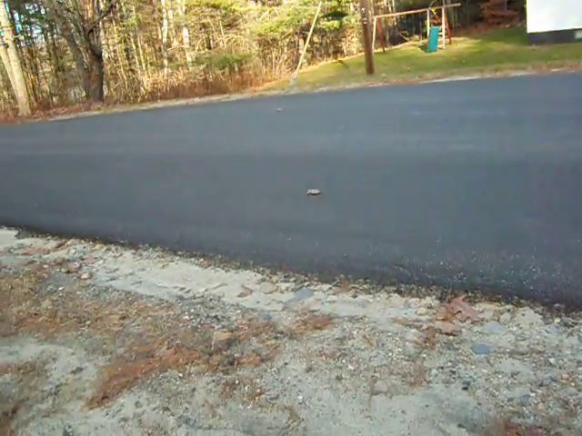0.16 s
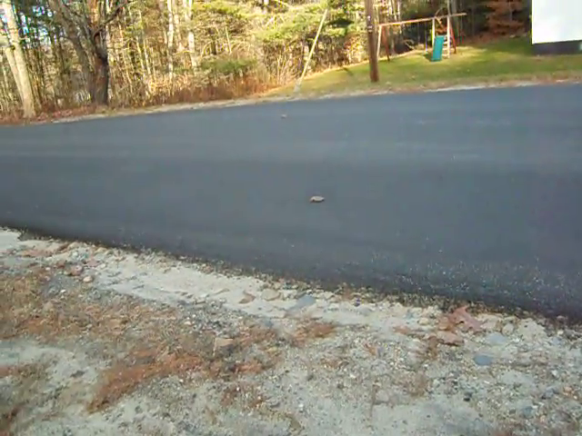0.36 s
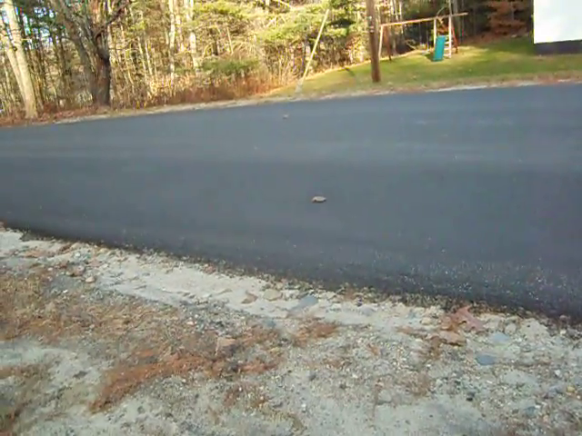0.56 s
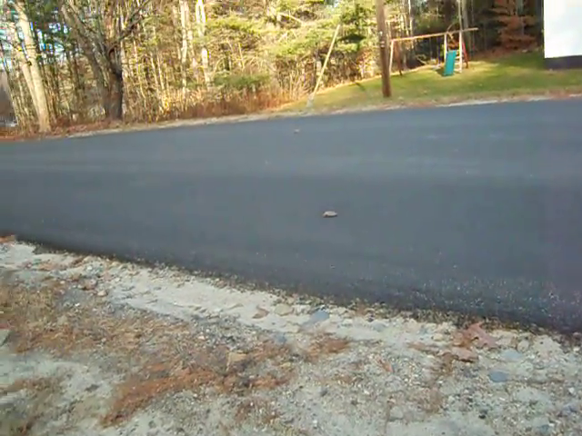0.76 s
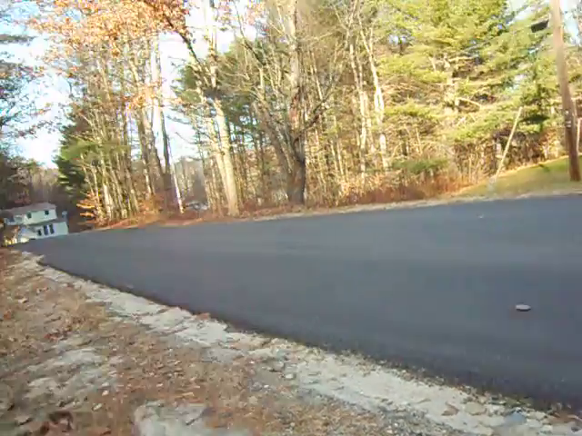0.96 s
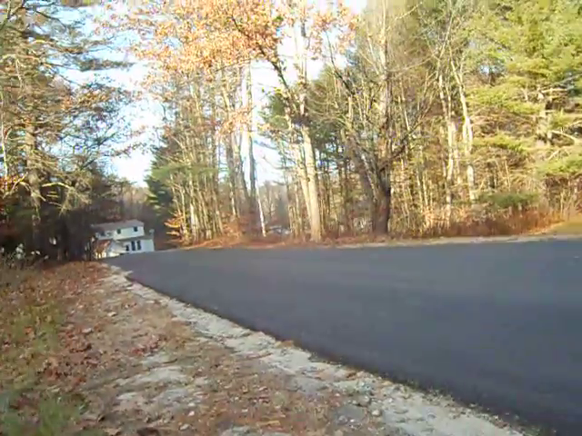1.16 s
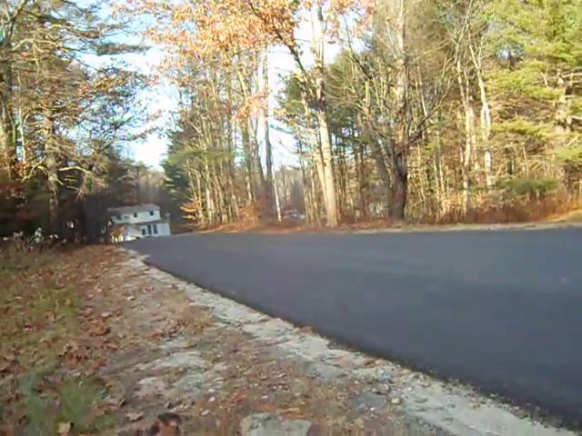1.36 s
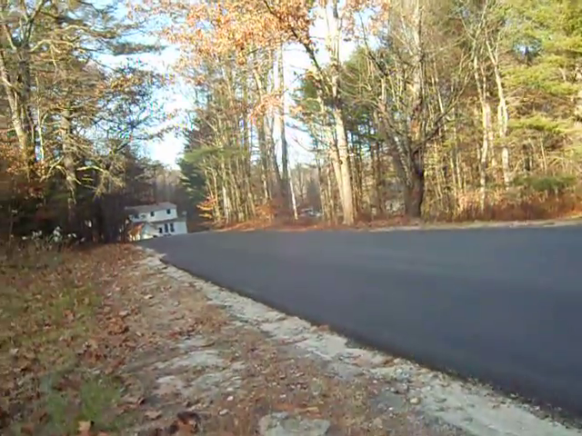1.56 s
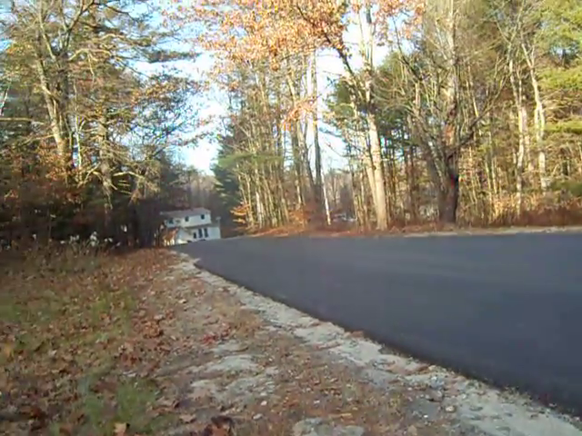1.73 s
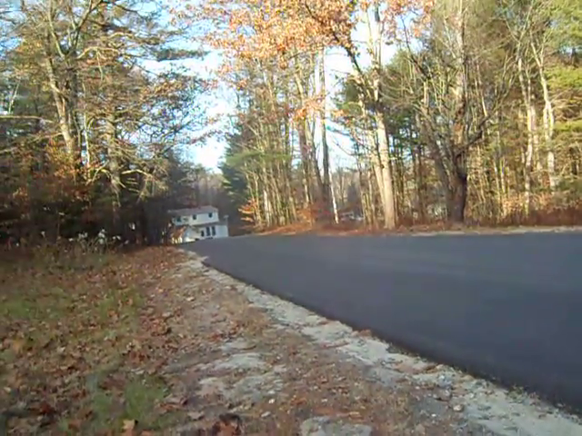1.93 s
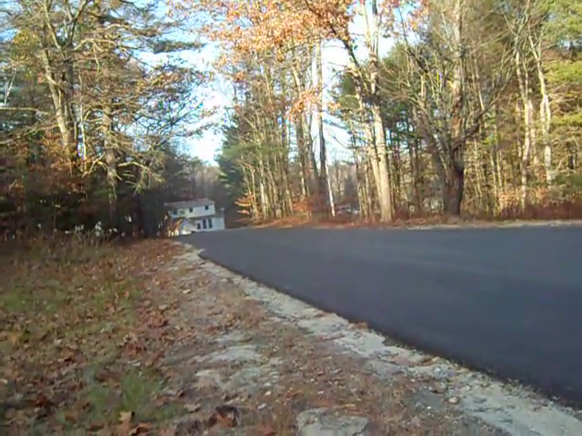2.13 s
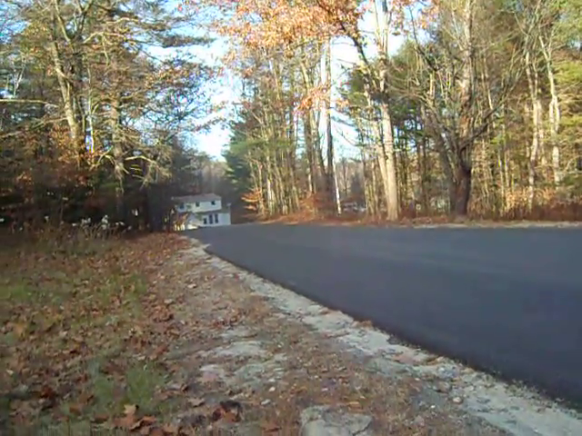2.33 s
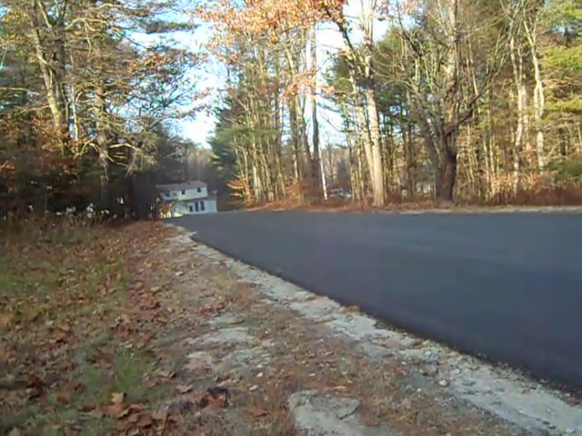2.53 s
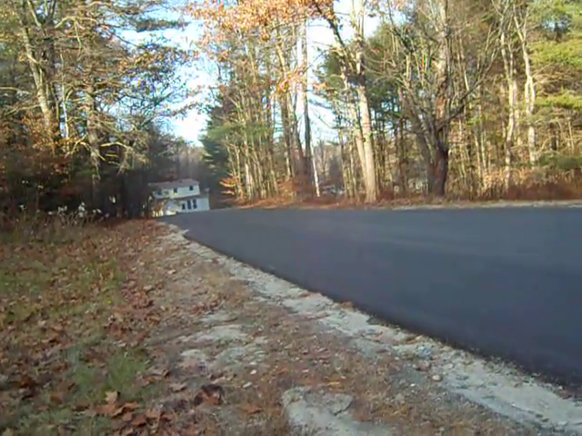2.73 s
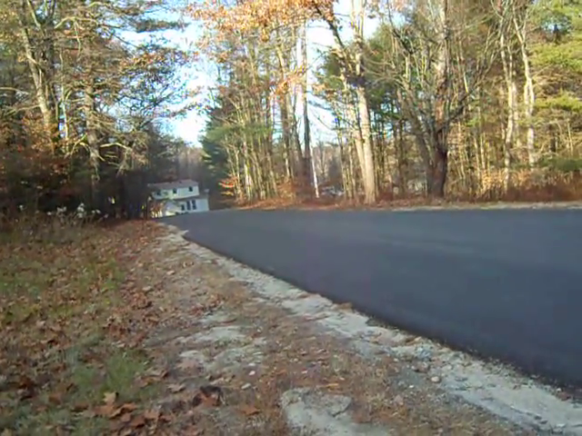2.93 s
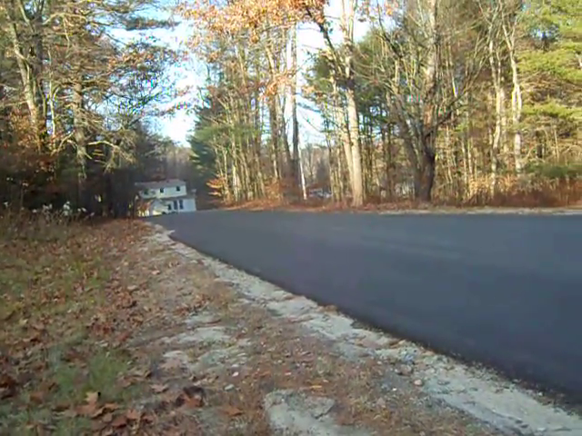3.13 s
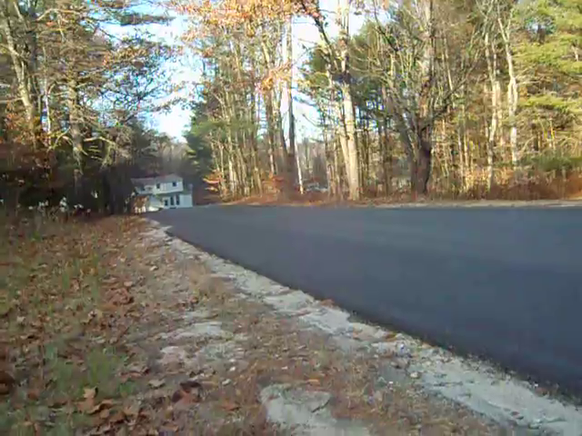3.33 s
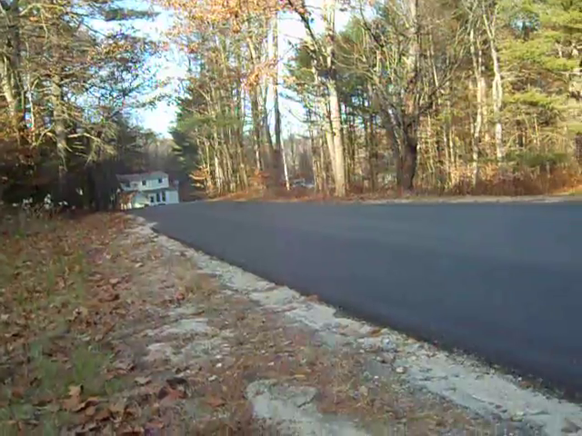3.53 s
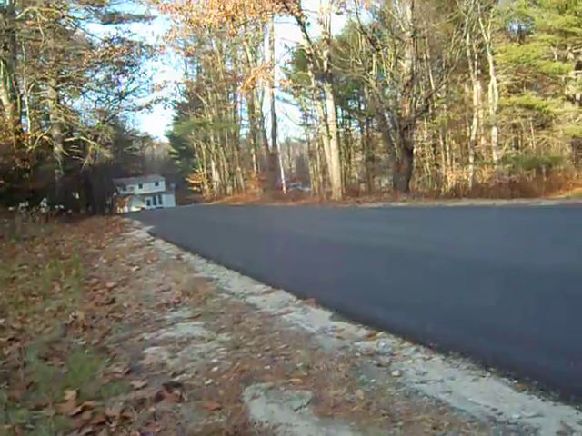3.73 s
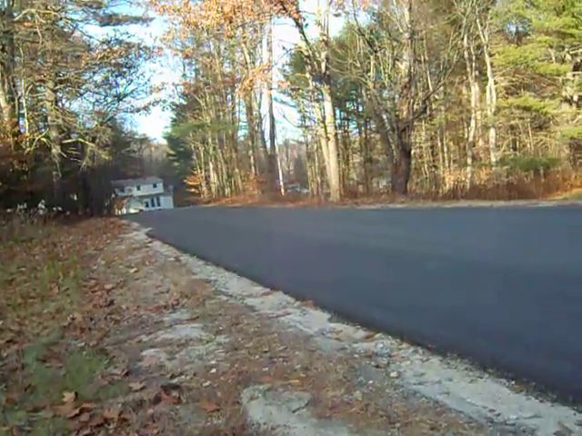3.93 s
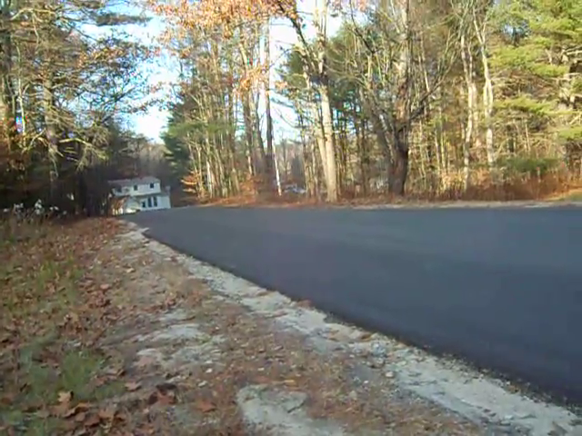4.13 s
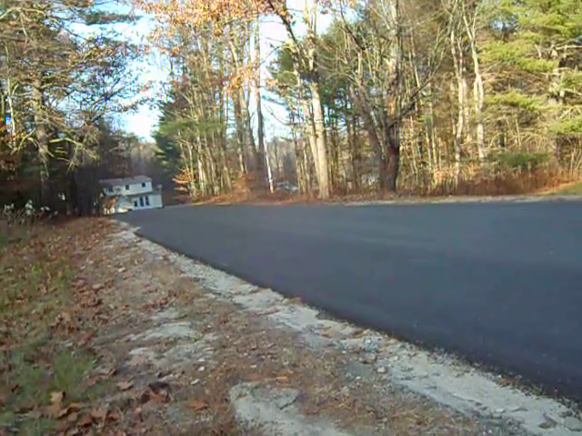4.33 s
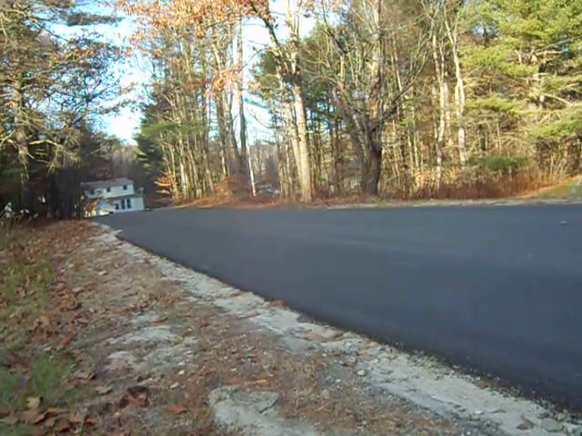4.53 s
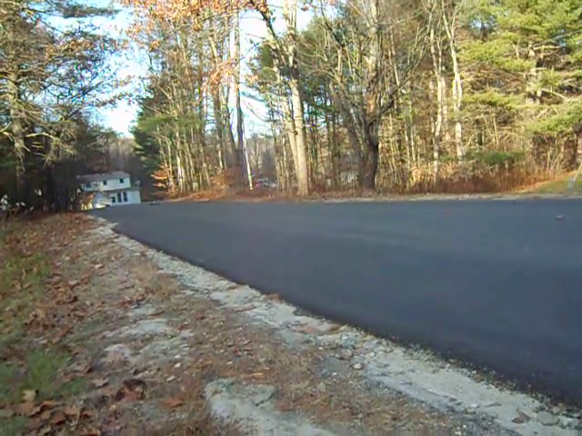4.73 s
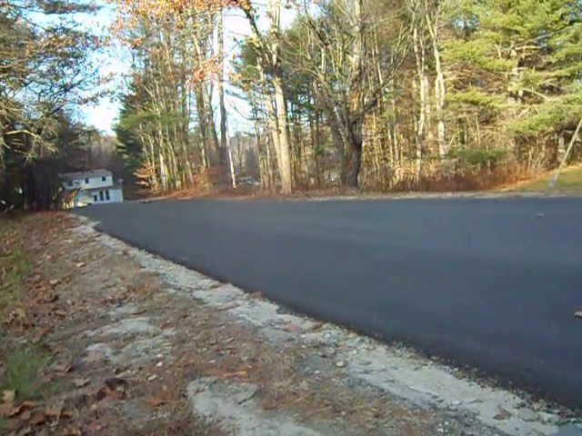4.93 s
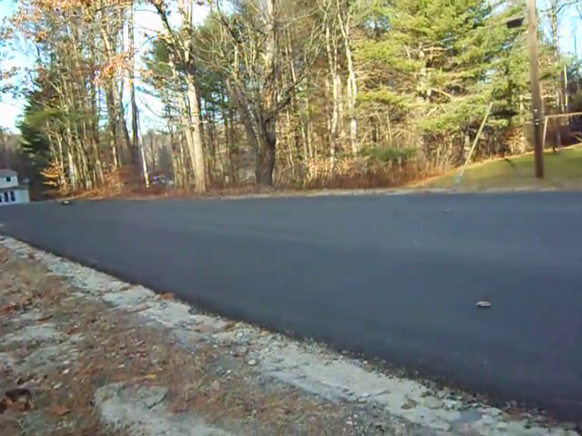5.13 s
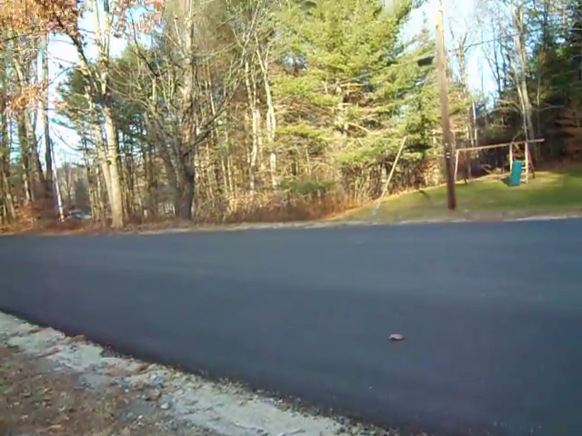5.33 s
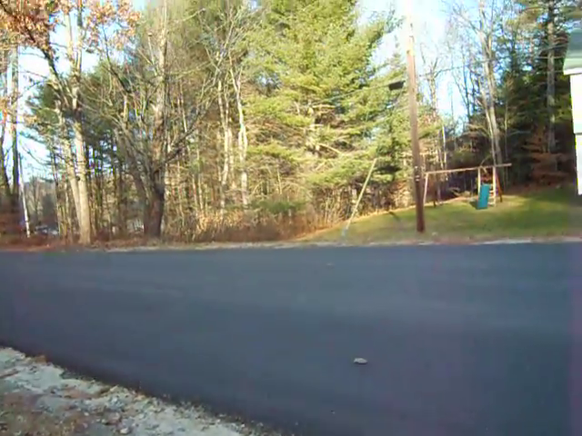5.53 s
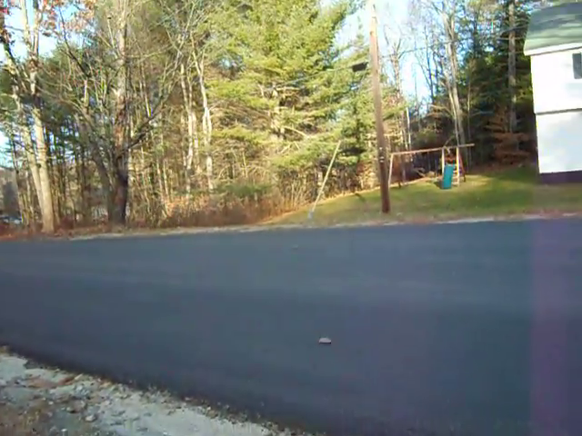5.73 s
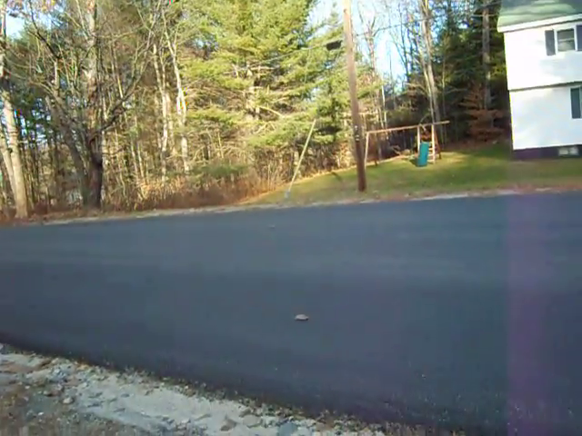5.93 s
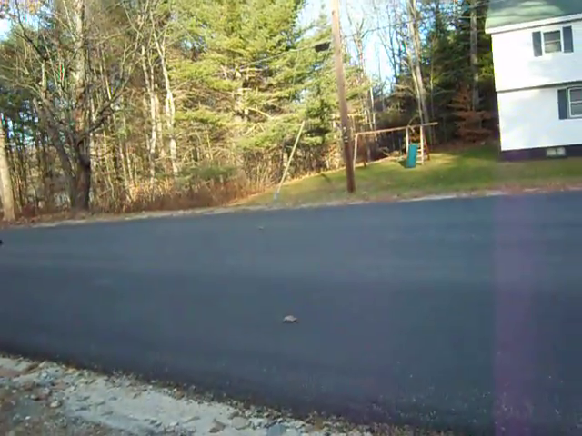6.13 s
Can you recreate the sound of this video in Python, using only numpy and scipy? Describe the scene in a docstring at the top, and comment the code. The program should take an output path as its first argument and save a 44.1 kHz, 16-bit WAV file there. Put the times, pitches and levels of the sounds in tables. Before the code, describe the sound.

A small electric model truck whines away down a paved road, blips its motor far off, then races back, rising to a shrill rasping scream close by.

```python
"""A gear whine: a small electric model truck drives off on asphalt, blips the throttle far away, then
accelerates back and spins its wheels close by. Gear tones follow the mesh rate, with overtones, throb and rasp.
Filtered noises make the tyres' hiss and drone, the motor can and the air; noise bursts flick grit at the shell.
A short low hoot, a gliding tone, sounds once over the quiet air, a faint hum and wind on the microphone."""
import sys
import numpy as np
from scipy import signal
from scipy.fft import rfft, irfft, next_fast_len
from scipy.io import wavfile
from scipy.ndimage import uniform_filter1d, map_coordinates

SR = 44100
rng = np.random.default_rng(int(sys.argv[2]) if len(sys.argv) > 2 else 0)


def wav_out(sig):
    """Save sig, one row per channel (or a flat mono array), as 16-bit PCM at SR to the path in sys.argv[1]."""
    wavfile.write(sys.argv[1], SR, np.round(np.clip(np.atleast_2d(sig).T, -1, 1) * 32767).astype(np.int16))


def linear_from_db(decibels):
    """Turn decibels (scalar or array-like) into linear amplitude factors; 0 gives 1."""
    return 10 ** (np.asarray(decibels, float) / 20)


N = 276507  # length in samples

# gear mesh, one table per burst of throttle (leaving, far blip, returning):
# [time_s, mesh_hz, load_db (reference for the partials), blur (0-1)]
THROTTLE_BURSTS = [
    [(0, 1568, -38, 0.32), (.044, 1325, -36.5, 0.35), (.12, 2013, -28, 0), (.188, 1393, -32.5, 0.41),
     (.27, 2288, -30.5, 0.25), (.3, 2013, -29, 0.47), (.345, 1936, -27, 0.01), (.37, 2260, -30, .8),
     (.6, 2340, -31.5, 0.9), (.76, 2210, -28.5, 0.77), (.91, 2146, -31.5, 0.73), (1.0, 2380, -28, .9),
     (1.1, 2200, -35, 0.8), (1.2, 2320, -35.5, 0.85), (1.28, 2124, -33.5, 0.46), (1.36, 2286, -29, 0.56),
     (1.4, 2310, -43, 0.52), (1.47, 2400, -37, 0.49), (1.54, 2450, -48, .9), (1.6, 2500, -38, .9),
     (1.66, 2510, -48, .9), (1.74, 2544, -38, .9), (1.8, 2600, -50, .9)],
    [(2.545, 500, -45, .4), (2.56, 488.5, -36, 0.32), (2.59, 499, -37.5, 0.54), (2.612, 718, -38, .4),
     (2.63, 1170, -28, 0.4), (2.655, 1300, -30, 0.2), (2.675, 1480, -27, 0.36), (2.75, 1358, -30, 0.4),
     (2.85, 1479, -29.5, 0.15), (2.9, 1370, -35, .3), (2.93, 1480, -38, 0.42), (3.1, 1481, -50, .55)],
    [(3.2, 465.8, -36, 0.23), (3.25, 479.5, -45, 0.28), (3.35, 505, -33, 0.14), (3.43, 530, -34, 0),
     (3.58, 664, -40, .2), (3.61, 689, -33.5, 0.14), (3.68, 713, -31.5, 0.25), (3.73, 741, -34, .15),
     (3.77, 770, -37, .15), (3.82, 842, -31, .2), (3.9, 900, -31, .2), (3.96, 1035, -34.5, .3),
     (4.0, 1140, -33, 0.17), (4.075, 1215, -32.5, .4), (4.1, 1343, -32.5, .25), (4.2, 1463, -29.5, 0.08),
     (4.42, 1666, -29, 0.11), (4.66, 1909, -30, 0.1), (4.7, 2090, -35, .6), (4.8, 2150, -33, 0.71),
     (4.9, 2337, -28.5, 0.26), (5.05, 2419, -29.5, 0.47), (5.25, 2540, -33.5, 0.56),
     (5.4, 2632, -25.5, 0.39), (5.5, 2677, -26, 0.01), (5.65, 2836, -21.5, 0.18), (5.8, 2860, -21.5, .1),
     (5.87, 3020, -19, 0.24), (5.91, 3480, -21.5, 0.2), (5.94, 4010, -17.5, 0), (5.97, 4740, -29, .1),
     (6.03, 4800, -27, 0), (6.045, 5140, -26.5, .1), (6.065, 5200, -18.5, 0.2), (6.09, 5180, -30.5, 0.3),
     (6.13, 5194, -22, .15), (6.15, 4865, -42, .5), (6.188, 4450, -32, .1), (6.197, 4050, -15, .1),
     (6.205, 3800, -19, .1), (6.212, 3600, -40, .3), (6.258, 1600, -45, .2), (6.264, 1700, -14.5, .1),
     (6.27, 3300, -15.5, .1) ],
]
# overtones over the load in each burst; the unloaded far blip rasps most:
# [octave_db, third_and_fourth_db, rasp_db]
OVERTONES_OVER_LOAD = [(-12, -12, -6.5), (-15, -3, -4), (-8.5, -8, -10.5)]
# how well the small body radiates a gear partial: [frequency_hz, gain_db]
BODY_RADIATION = [(450, -27.5), (1230, -13), (1340, -3), (1500, 1.5), (1750, -1), (2100, -2.5), (2700, 5.5),
                  (3400, -6.5), (3800, -10.5), (4200, 0), (4700, -15.5), (5300, -13), (5650, 0.5),
                  (5950, 0), (6300, -2.5), (9000, -24)]
# broad resonances of the plastic shell: [centre_hz, width_hz, gain_db]
SHELL_RESONANCES = [(1480, 117, 4.5), (2860, 1200, 2), (3900, 1200, 4.5), (6700, 3900, -3)]
# second gear stage, a thin line climbing under the mesh: [time_s, pitch_hz, level_db]
SECOND_STAGE = [(4.75, 1154, -49), (4.85, 1243, -46.5), (5.87, 1595, -34), (5.95, 1675, -41)]
# freewheeling, a faint smeared whistle: [start_s, length_s, start_level_db]
COASTING_SPELLS = [(1.402, 0.1, -35.5), (1.589, 0.05, -33.5), (1.704, 0.15, -36), (1.93, .21, -42),
                   (2.43, 0.17, -49.5)]
# rolling: [time_s, nearness_db, brightness_db (higher when the truck comes nose first under power)]
ROLLING_COURSE = [(0, -30.5, -1.5), (.23, -31.5, 1.2), (.28, -37, 1), (.32, -30, 1), (.55, -29, -1.5),
                  (.82, -31.5, -2.5), (1.11, -28.5, 1.5), (1.4, -31.5, 1.5), (1.52, -31, -3),
                  (1.74, -31.5, -2), (1.85, -40, -2.5), (2.18, -42.5, .3), (2.25, -52.5, 7),
                  (2.49, -44.5, 3.5), (2.65, -34.5, 1.5), (2.91, -35.5, 3.5), (2.99, -45.5, -1.5),
                  (3.21, -45, 1.5), (3.82, -38, 2), (4.09, -36, 2), (4.7, -35, 5), (4.8, -34, 5),
                  (5.45, -30, 4), (5.85, -25.5, 4.5), (5.94, -22.5, 6), (5.965, -22, -2.5),
                  (5.99, -20.5, 5), (6.15, -17, 4), (6.27, -18.5, 2)]
# spectra of rumble, hiss, rattle and fizz, each: [frequency_hz, density_db (per Hz, relative)]
ROLLING_SPECTRA = ([(60, -120), (90, -17), (200, -12.5), (400, -13), (650, -1), (1000, -6.5), (1300, -16.5),
                   (1600, -120)], [(800, -120), (1100, -2), (1600, 3.5), (2200, 2), (2900, 8), (3400, 2.5),
                   (3800, -7), (4200, -120)], [(3000, -120), (3400, -11.5), (3800, -3.5), (4400, -1),
                   (4900, -4.5), (5300, -4.5), (5700, -120)], [(4700, -120), (5100, -10.5), (5600, 0.5),
                   (6300, -1), (7300, -0.5), (8500, -4), (9100, -6.5)])
# the same four noises, relative to each other and to the nearness: [level_db]
ROLLING_BALANCE = [-8.5, -0.3, -9, -13]
# the same four noises: [gain_db per dB of brightness]
ROLLING_TILTS = [-.9, 0.13, -0.25, 1.46]
# the same four noises: [share of each bump]
ROLLING_JOLT_SHARES = [1.5, 1.08, 0.48, 0.52]
# bumps in the road that jolt the whole truck: [time_s, swell_db (before each noise takes its share)]
ROAD_BUMPS = [(1.34, 3.5), (1.53, 3), (1.6, 3.5), (1.72, -1), (5.94, 2), (6.265, 2.5)]
# delay of the copy off the asphalt: [time_s, lag_ms]
ASPHALT_LAG = [(0, .512), (.8, 0.5), (1.3, 0.46), (1.8, 0.48), (2.7, 0.5), (4.2, .49), (4.6, .47),
               (5.0, 0.45), (5.4, 0.49), (6.27, 0.5)]
# grit flicked against the shell: [start_s, burst_db (before its envelope and the shell)]
GRIT_HITS = [(1.35, -34.5), (1.489, -38.5), (1.5194, -15), (1.593, -25), (1.7111, -12.5), (1.7403, -17.5),
             (1.7828, -18), (1.7988, -20.5), (2.538, -37.5), (5.8631, -12.5), (5.9302, -7.5),
             (5.9535, -4.5), (6.197, -5), (6.2106, -14), (6.2634, -27)]
# spectrum of the quiet air: [frequency_hz, density_db (per Hz, relative)]
AIR_SPECTRUM = [(13, -31), (22, 4), (50, -6), (85, -6), (108, 1.5), (150, -4), (300, -4), (616, -7),
                (900, -5.5), (1150, -7.5), (3560, -13), (7180, -17), (9100, -20.5)]
# wind gusts: [time_s, swell_db (over the calm)]
WIND_GUSTS = [(3.78, 17), (4.17, 26.5)]
# response of the microphone chain: [frequency_hz, gain_db]
MICROPHONE_RESPONSE = [(7000, -0.5), (7600, -2.5), (7950, -19.5), (8080, -20.5), (8250, -12), (8700, -21.5),
                       (9000, -24.5)]


def unit(x):
    """Normalisation: scales a signal to rms 1."""
    return x / np.sqrt(np.mean(np.abs(x) ** 2) + 1e-20)


def curves(rows):
    """Linear interpolation: one value per sample for each column after the time."""
    s, *columns = np.transpose(rows)
    return [np.interp(np.arange(N) / SR, s, column) for column in columns]


def sounding(rows):
    """Gating: 1 between the first and last row, with 10 ms fades outside them."""
    t = np.arange(N) / SR
    inside_s = np.minimum(t - rows[0][0], rows[-1][0] - t)
    return np.clip(inside_s / .01 + 1, 0, 1)


def swells(rows, wide_s):
    """Gaussian envelopes: bell-shaped swells from (time_s, height) rows."""
    t = np.arange(N) / SR
    return sum(height * np.exp(-.5 * ((t - s) / wide_s) ** 2) for s, height in rows)


def wobble(rate):
    """Slow random modulation: a smooth curve through rate random knots a second."""
    knots = rng.standard_normal(int(N * rate / SR) + 4)
    return map_coordinates(knots, [np.arange(N) * rate / SR])


def filtered(x, response):
    """Linear filtering: multiplies the spectrum by a complex response of frequency."""
    m = next_fast_len(N + 8192)
    return irfft(rfft(x, m) * response(np.fft.rfftfreq(m, 1 / SR)), m)[:N]


def rush(spectrum, patchy_db):
    """Coloured noise: rms 1, with random gain in patches of time and frequency."""
    z = signal.stft(rng.standard_normal(N), nperseg=512)[2]
    field = uniform_filter1d(rng.standard_normal(z.shape), size=5, axis=0)
    field = uniform_filter1d(field, size=8, axis=1)
    x = signal.istft(z * linear_from_db(patchy_db * unit(field)), nperseg=512)[1][:N]
    f, db = np.transpose(spectrum)

    def colour(hz):
        return linear_from_db(np.interp(np.log(hz + 1), np.log(f + 1), db, -120, -120))

    return unit(filtered(x, colour))


def tone(turns, blur, spread):
    """Narrow-band modulation: a tone of rms 1, partly smeared into noise; spread is its width over the pitch."""
    blur = np.clip(blur, 0, 1)
    knots = rng.standard_normal((2, N // 4))
    real, imaginary = (map_coordinates(k, [turns * spread]) for k in knots)
    smear = unit(real + 1j * imaginary)
    carrier = np.exp(2j * np.pi * turns)
    return np.sqrt(2) * np.real(carrier * (np.sqrt(1 - blur) + np.sqrt(blur) * smear))


def breathy(hz, spread):
    """Narrow-band noise: a loose whistle with no steady part."""
    return tone(np.cumsum(hz * np.ones(N)) / SR, 1.0, spread=spread)


def shell(x):
    """Parallel resonance: the plastic shell rings at a few broad modes of alternating sign."""
    def response(f):
        total = 0
        for k, (centre, width, db) in enumerate(SHELL_RESONANCES):
            damping = 1j * f * width
            total = total + (-1) ** k * linear_from_db(db) * damping / (centre * centre - f * f + damping)
        return total

    return filtered(x, response)


def radiated(hz):
    """Radiation efficiency: the body's gain in dB at a partial, interpolated over log frequency."""
    f, db = np.transpose(BODY_RADIATION)
    return np.interp(np.log(hz), np.log(f), db)


def gears(rows, over_db):
    """Periodic tooth contact: teeth meet at the mesh rate; out-of-round gears throb and waver once a turn."""
    hz, load_db, blur = curves(rows)
    octave_over_db, upper_over_db, rasp_over_db = over_db
    mesh_db = load_db + np.minimum(radiated(hz), 0) * (hz < 3000)
    octave_db = load_db + octave_over_db + radiated(2 * hz) + 1.6 * wobble(9)
    # above a knee in mesh rate the higher partials and the rasp lose so many dB per octave
    upper_db = load_db + upper_over_db - 18.5 * np.maximum(np.log2(hz / 900), 0)
    rasp_db = load_db + rasp_over_db - 26 * np.maximum(np.log2(hz / 1350), 0) + 1.4 * wobble(9)

    teeth = np.cumsum(hz * (1 + 0.00375 * wobble(60) + .02 * blur * wobble(30))) / SR
    big = 2 * np.pi * teeth / 60  # rotation in radians of a 60-tooth gear
    small = 2 * np.pi * teeth / 15  # and of a 15-tooth gear
    big = big - big[round(4.935 * SR)]  # a throb peaks at this second
    depth = .15 + swells([(5.0, .5)], wide_s=.2)
    throb = sounding(rows) * np.exp(depth * (np.cos(big) - depth / 2))
    throb = throb * (1 + 0.13 * np.cos(2 * big + 1) + 0.12 * np.cos(small))
    # run-out of the big gear swings the pitch, lowest at each throb and less at speed
    run_out = .28 * (1500 / np.maximum(hz, 1500)) ** 1.6 * np.sin(big)
    teeth = teeth - run_out + 0.069 * np.sin(small)  # the small gear adds side strands

    mesh = linear_from_db(mesh_db) * tone(teeth, blur, spread=.16)
    octave = linear_from_db(octave_db) * tone(2 * teeth, 0.71 * blur, spread=.04)
    third = tone(3 * teeth, blur, spread=.08)
    fourth = 0.34 * tone(4 * teeth, blur, spread=0.045)
    upper = linear_from_db(upper_db) * (third + fourth)
    # the motor's own switching: a rough band at about three and a half times the mesh rate
    rasp = linear_from_db(rasp_db) * tone(3.55 * teeth, .9, spread=.13)
    return throb * (mesh + octave) + shell(throb * (upper + rasp))


def second_stage():
    """Gear reduction: a slower pair of gears sings a thin line that climbs under the mesh tone."""
    hz, db = curves(SECOND_STAGE)
    return sounding(SECOND_STAGE) * linear_from_db(db) * tone(np.cumsum(hz) / SR, 0.24, spread=0.11)


def coasting():
    """Loose contact: unloaded gears whistle as narrow-band noise, falling 8 dB over each spell."""
    t = np.arange(N) / SR
    level = 0
    for s, length, db in COASTING_SPELLS:
        fade_db = 8 * np.clip((t - s) / length, 0, 1)
        level = level + sounding([[s], [s + length]]) * linear_from_db(db - fade_db)
    return level * breathy(2907, spread=.18)


def motor_can():
    """Forced resonance: brush noise rings the steel can in a high band, most at middle speed on the way back."""
    mesh_hz = curves(THROTTLE_BURSTS[-1])[0]
    boost_db = 14 / (1 + ((mesh_hz - 1900) / 450) ** 2)
    lag_s = curves(ASPHALT_LAG)[0] / 1000
    band_hz = 3.0 / lag_s  # where the copy off the asphalt would lag three cycles
    nearness_db = curves(ROLLING_COURSE)[0]
    return linear_from_db(nearness_db - 19 + boost_db) * breathy(band_hz, spread=.12)


def rolling():
    """Random excitation: tyres, chassis and motor make four noises jolted by the road, partly together."""
    near_db, bright_db = curves(ROLLING_COURSE)
    bumps_db = swells(ROAD_BUMPS, wide_s=0.016)
    shared_db = 0.16 * wobble(30) + 0.47 * wobble(150)
    out = 0
    for over_db, tilt, share, spectrum in zip(
            ROLLING_BALANCE, ROLLING_TILTS, ROLLING_JOLT_SHARES, ROLLING_SPECTRA):
        level_db = near_db - 2 + over_db + tilt * bright_db + share * bumps_db
        own_db = 0.75 * wobble(12) + 0.87 * wobble(40)
        out = out + linear_from_db(level_db + shared_db + own_db) * rush(spectrum, patchy_db=0.67)
    return out


def asphalt(x):
    """Comb filtering: a late copy off the road puts moving notches in the spectrum."""
    late = np.arange(N) - curves(ASPHALT_LAG)[0] * SR / 1000
    return x + 0.2 * map_coordinates(x, [late])


def drone():
    """Narrow-band excitation: a rough stretch makes the tyres drone briefly on one low note."""
    return linear_from_db(-40) * swells([(1.61, 1)], wide_s=.11) * breathy(647, spread=.2)


def grit():
    """Impact excitation: each stone is a short burst of noise that rings the shell."""
    out, t = np.zeros(N + SR), np.arange(SR // 20) / SR
    envelope = linear_from_db(-60 * t / .024) * (1 - np.exp(-t / .0006))  # 60 dB down in 24 ms, onset 0.6 ms
    for s, db in GRIT_HITS:
        out[round(s * SR):][:len(t)] += linear_from_db(db) * rng.standard_normal(len(t)) * envelope
    return shell(out[:N]) + .3 * out[:N]


def woods(x):
    """Diffuse reflection: trees and houses send back a short smear of echoes."""
    t = np.arange(SR // 3) / SR
    # 60 dB decay rate per 0.82 s, after a 12 ms gap
    tail = rng.standard_normal(len(t)) * linear_from_db(-60 * t / 0.82) * (t > .012)
    return signal.fftconvolve(x, tail / np.linalg.norm(tail))[:N]


def hoot():
    """Frequency glide: one soft rising note with a faint octave."""
    middle_s, half_s = 2.166, 0.045
    u = np.clip((np.arange(N) / SR - middle_s) / half_s, -1, 1)
    hz = 355.6 + 54.3 * np.sin(u * np.pi / 2)
    turn = 2 * np.pi * np.cumsum(hz) / SR
    level = linear_from_db(-21 - 42 * np.abs(u) ** 2.2) * (np.abs(u) < 1)  # both ends 42 dB under the peak
    return np.sqrt(2) * level * (np.sin(turn) + linear_from_db(-24.5) * np.sin(2 * turn))


def air():
    """Broadband background: far hiss of the woods, a wavering low hum and wind on the microphone."""
    hiss = linear_from_db(-40.72) * rush(AIR_SPECTRUM, patchy_db=1.07)
    hum = linear_from_db(-51) * tone(69 * np.arange(N) / SR, .9, spread=0.34)
    wind_spectrum = [(15, -10.5), (30, -4.5), (50, -16.5), (75, -25)]  # frequency_hz, density_db
    wind_db = -62 + swells(WIND_GUSTS, wide_s=0.049)
    return hiss + hum + linear_from_db(wind_db) * rush(wind_spectrum, patchy_db=4.5)


def scene():
    """Superposition: the truck with its echoes, over the quiet roadside."""
    whine = sum(map(gears, THROTTLE_BURSTS, OVERTONES_OVER_LOAD))
    truck = whine + second_stage() + coasting() + motor_can() + grit()
    echoes = linear_from_db(-11.5) * woods(truck)
    mix = truck + echoes + asphalt(rolling()) + drone() + hoot() + air()
    return mix[None]


def roll_off(x):
    """The treble ends steeply here."""
    return signal.sosfilt(signal.butter(12, 8920, fs=SR, output="sos"), x)


def record(dry):
    """Low-pass response: the small microphone chain rolls off steeply at the top."""
    f, db = np.transpose(MICROPHONE_RESPONSE)
    mix = filtered(dry[0], lambda hz: linear_from_db(np.interp(hz, f, db)))[None]
    return roll_off(mix)


dry = scene()
out = record(dry)
wav_out(out)
```